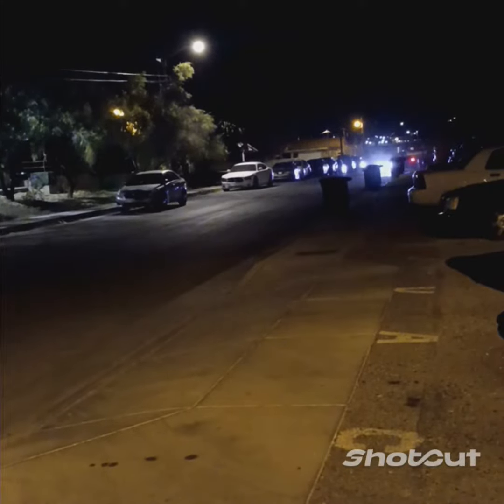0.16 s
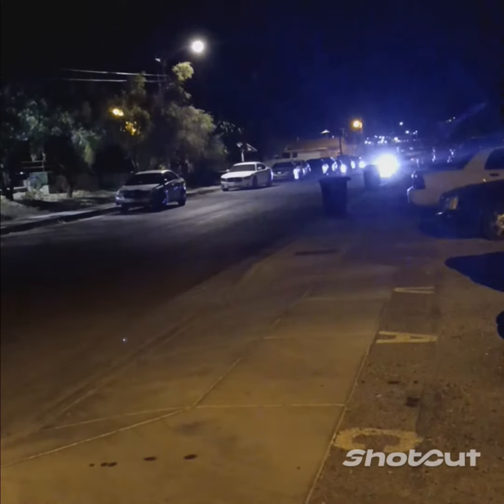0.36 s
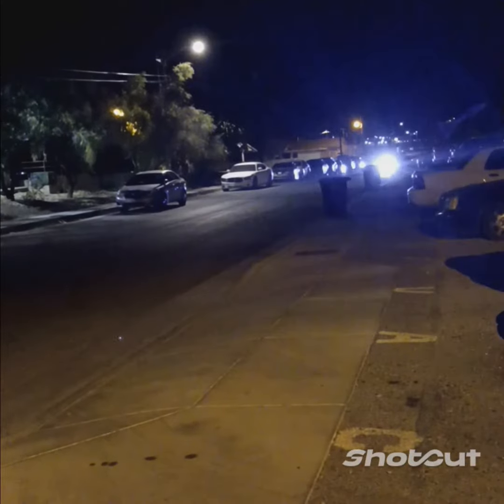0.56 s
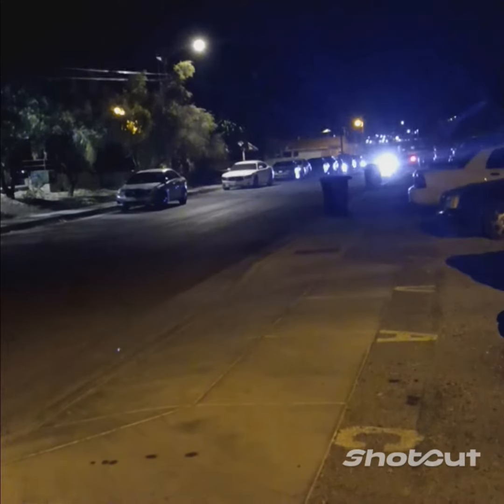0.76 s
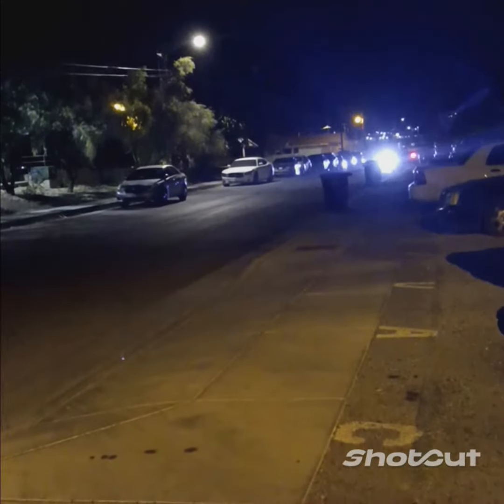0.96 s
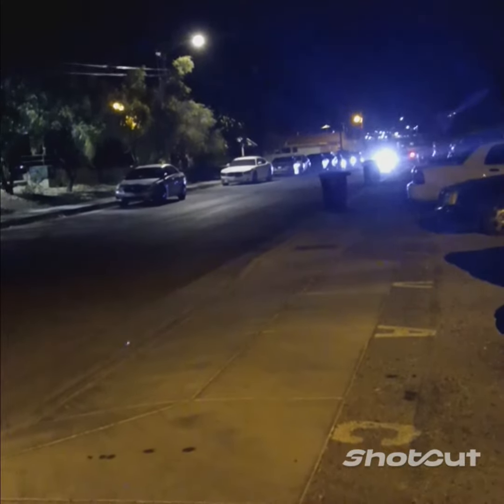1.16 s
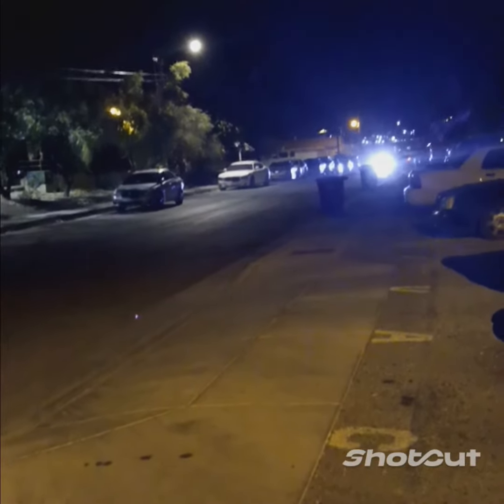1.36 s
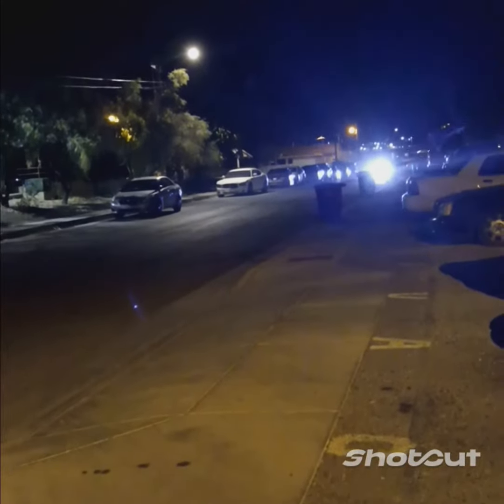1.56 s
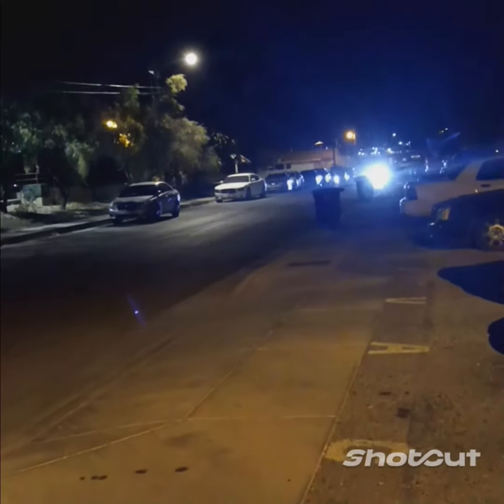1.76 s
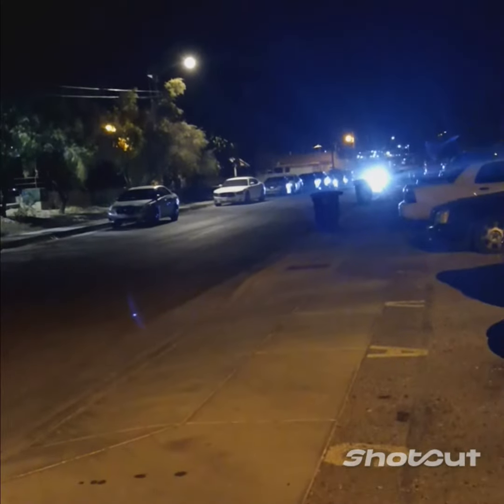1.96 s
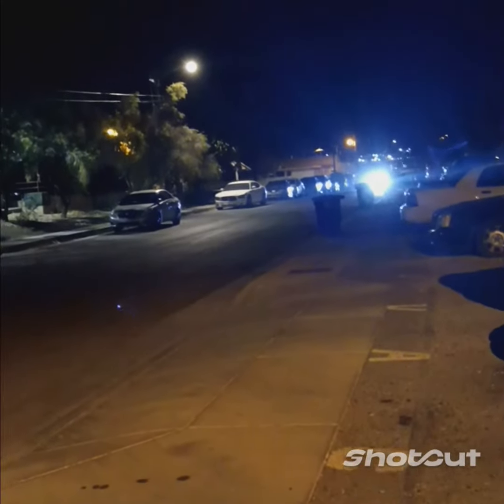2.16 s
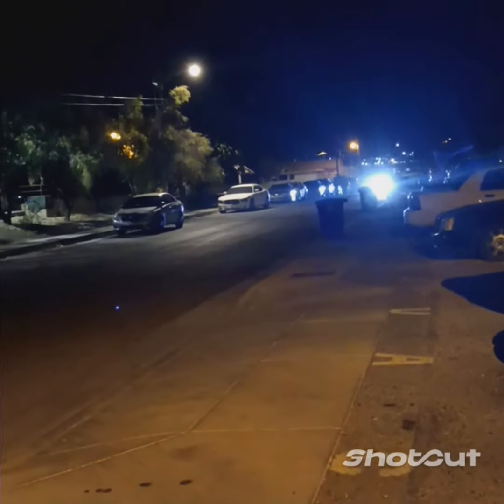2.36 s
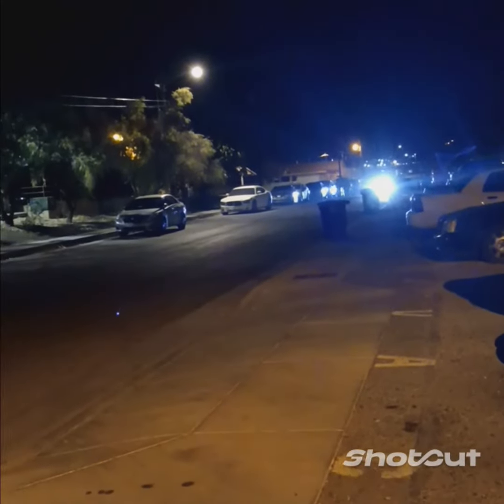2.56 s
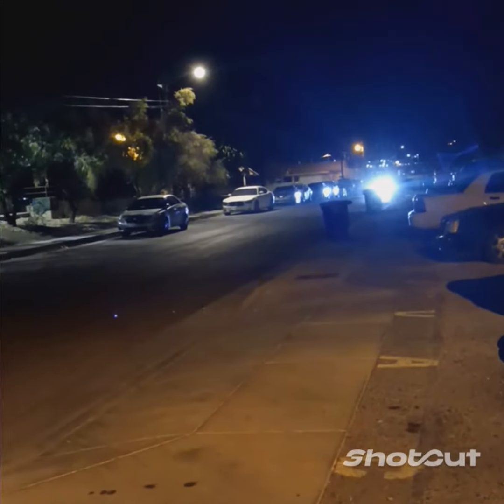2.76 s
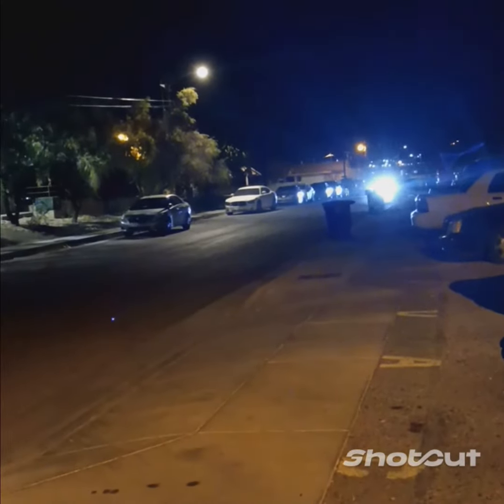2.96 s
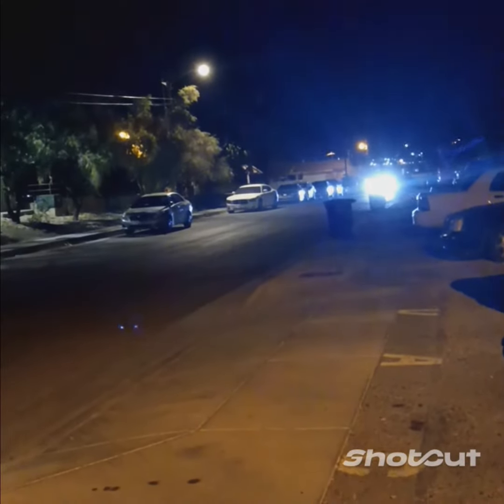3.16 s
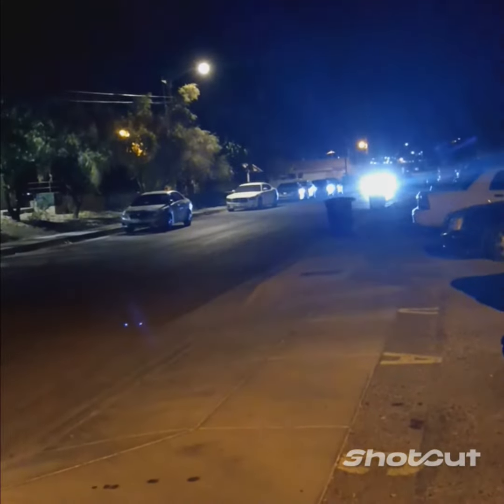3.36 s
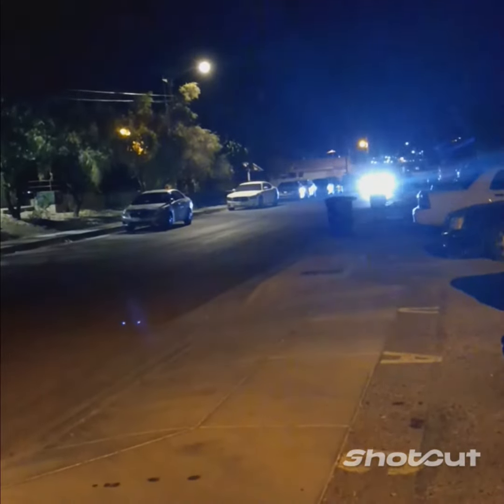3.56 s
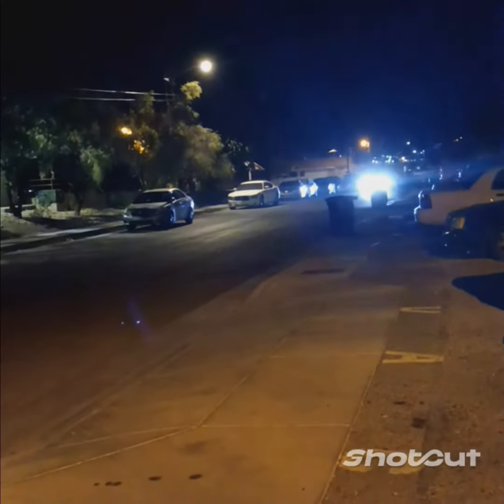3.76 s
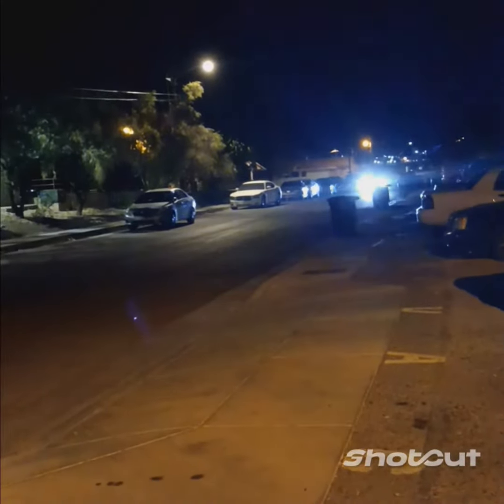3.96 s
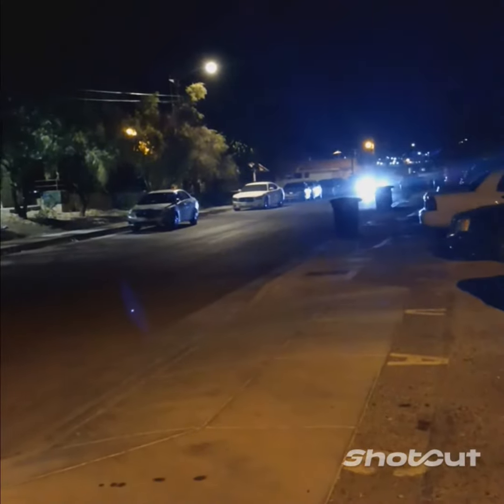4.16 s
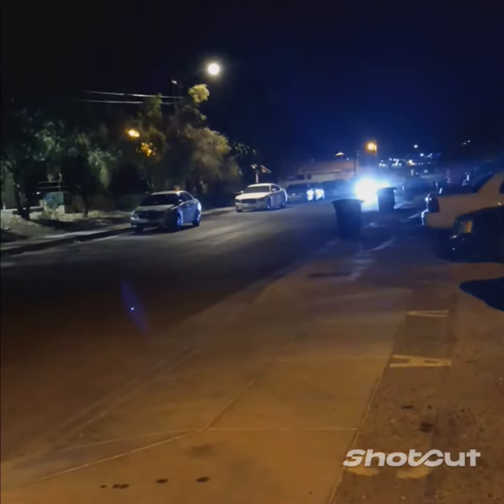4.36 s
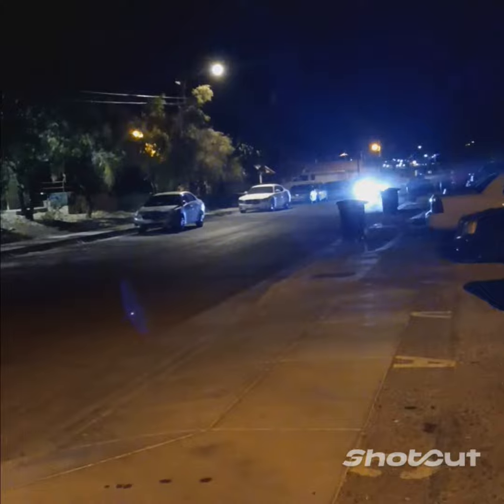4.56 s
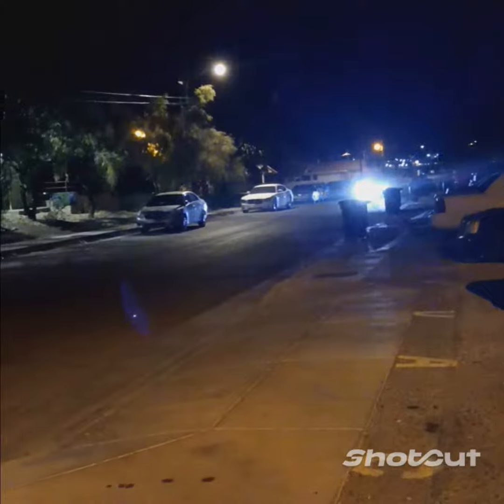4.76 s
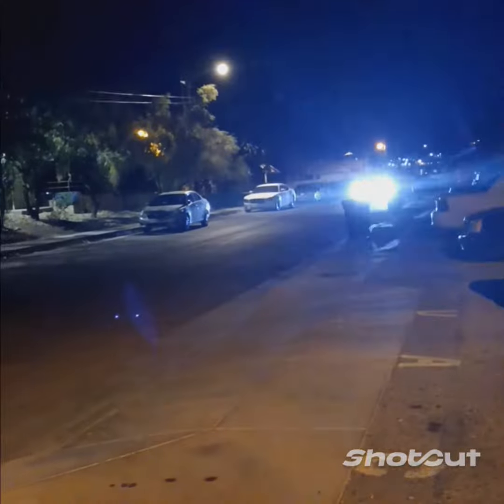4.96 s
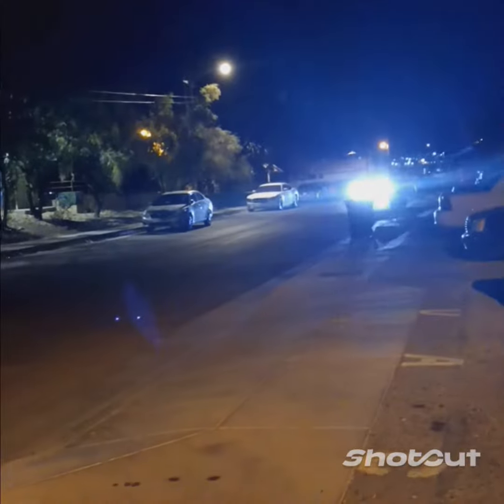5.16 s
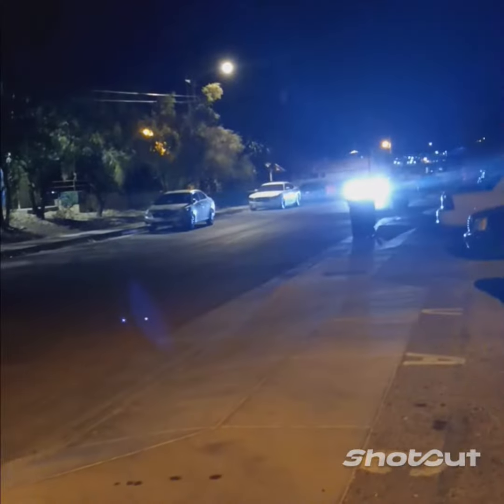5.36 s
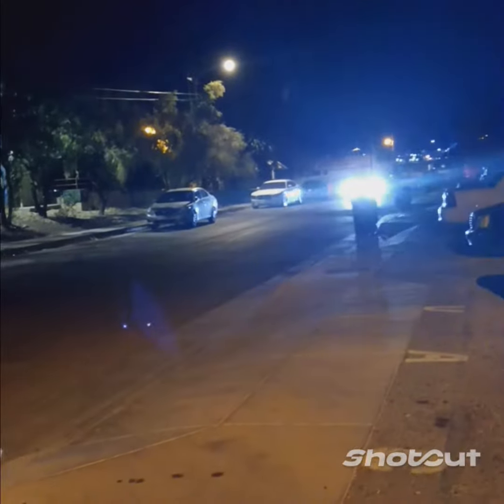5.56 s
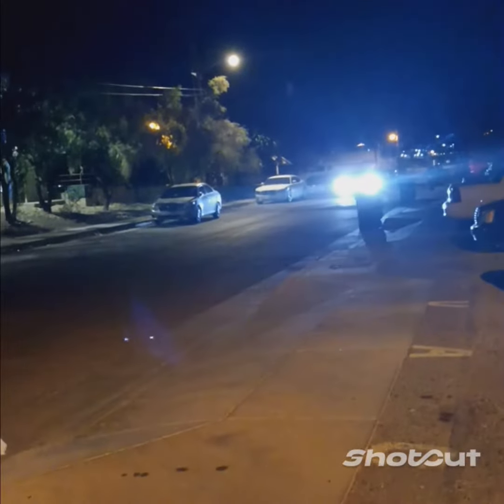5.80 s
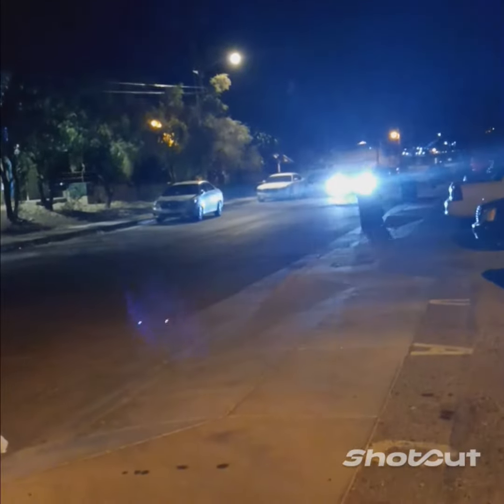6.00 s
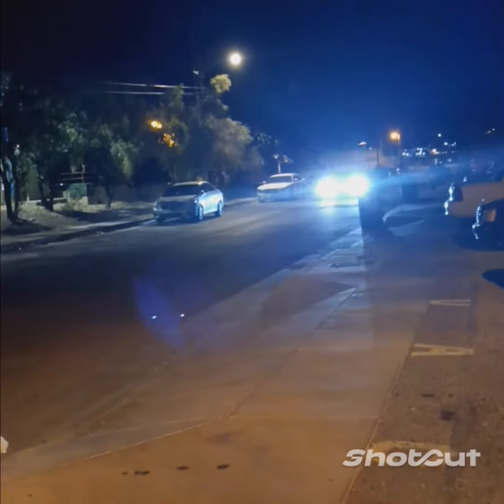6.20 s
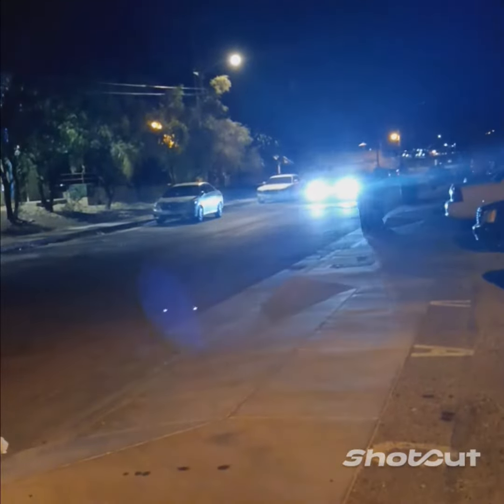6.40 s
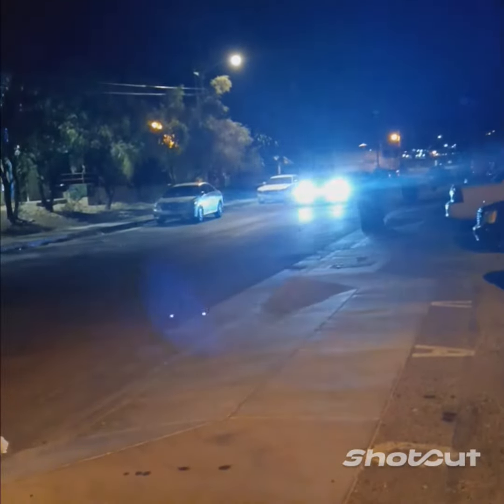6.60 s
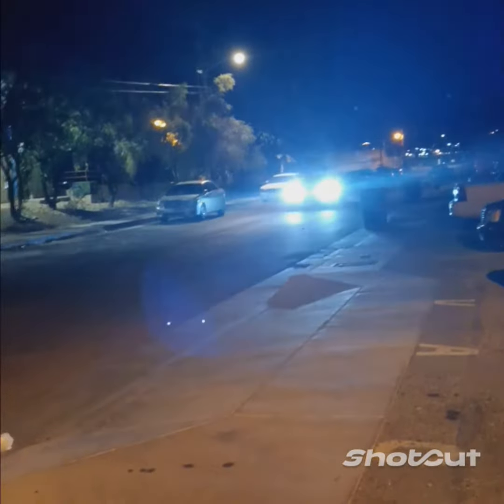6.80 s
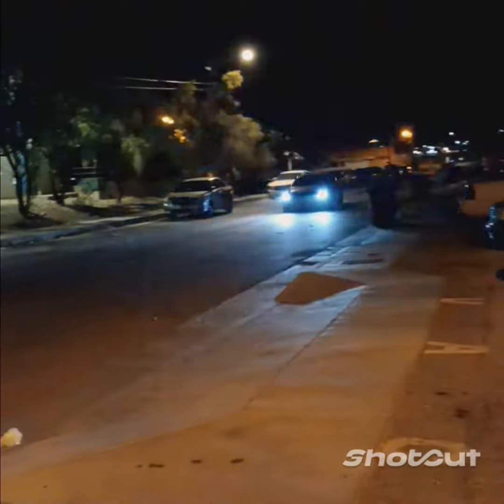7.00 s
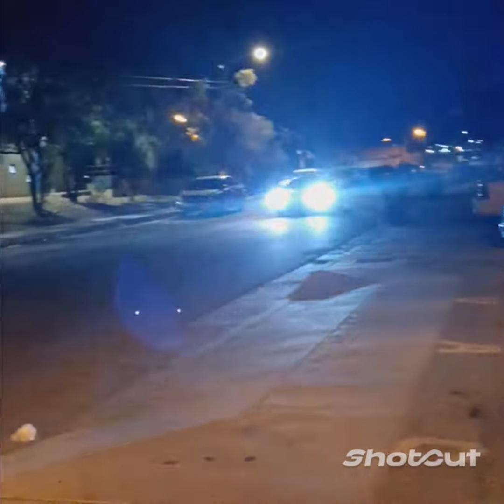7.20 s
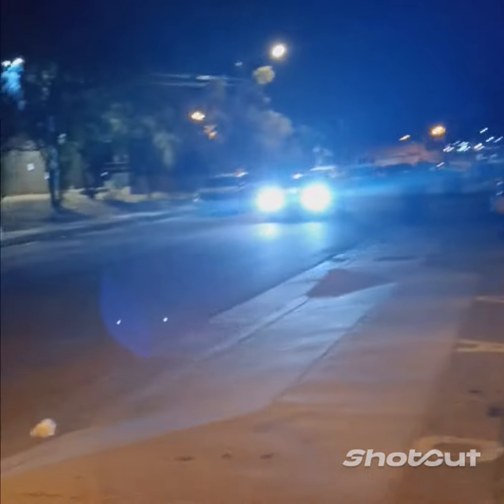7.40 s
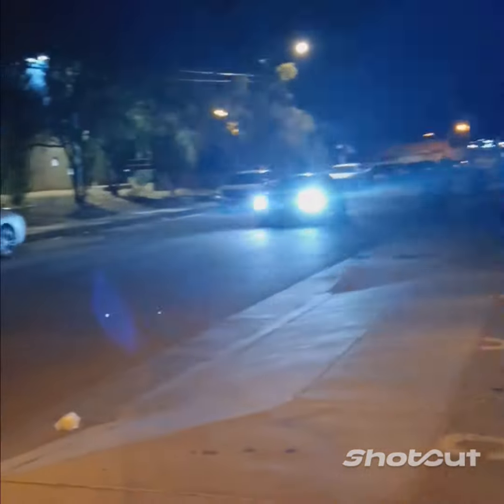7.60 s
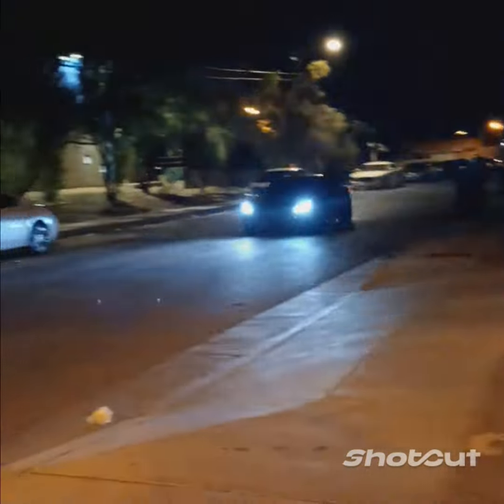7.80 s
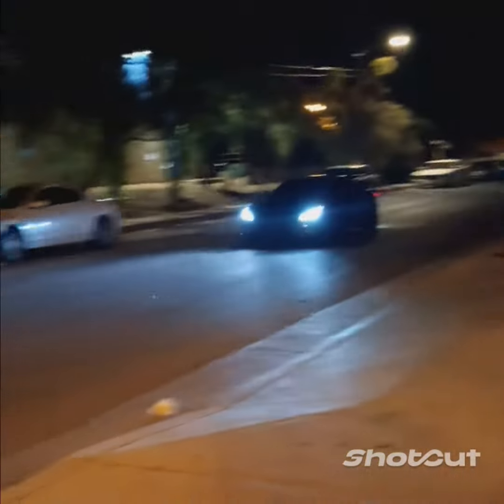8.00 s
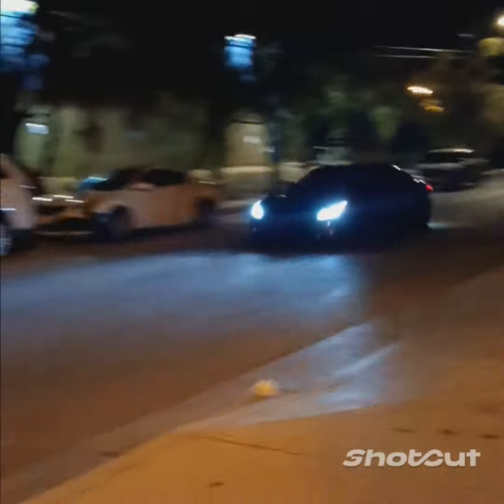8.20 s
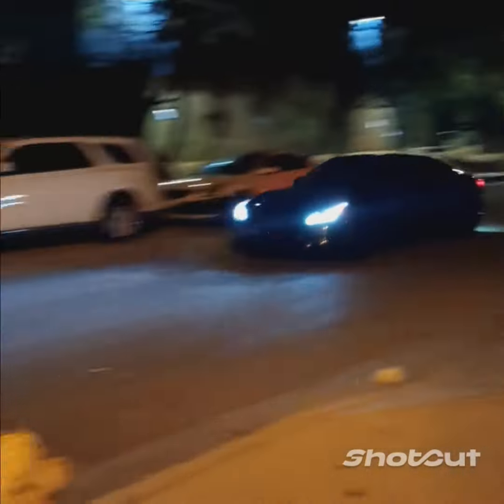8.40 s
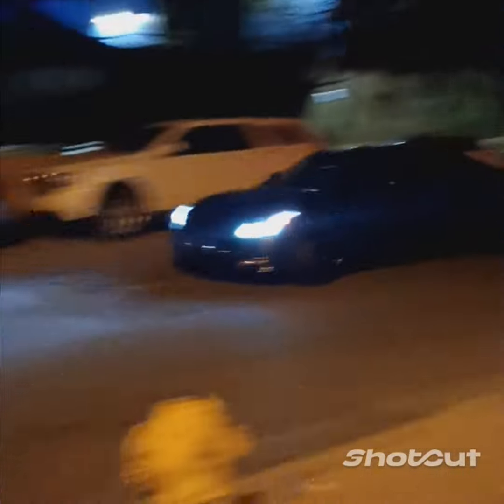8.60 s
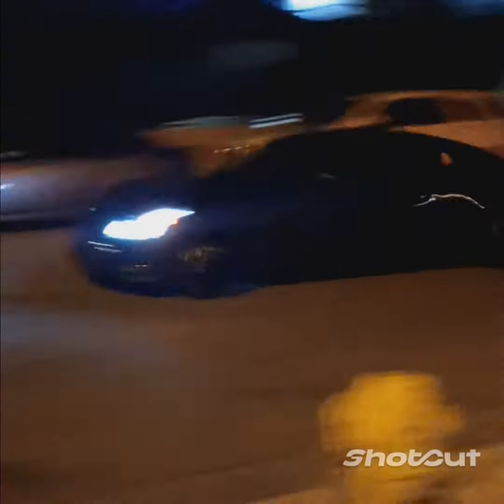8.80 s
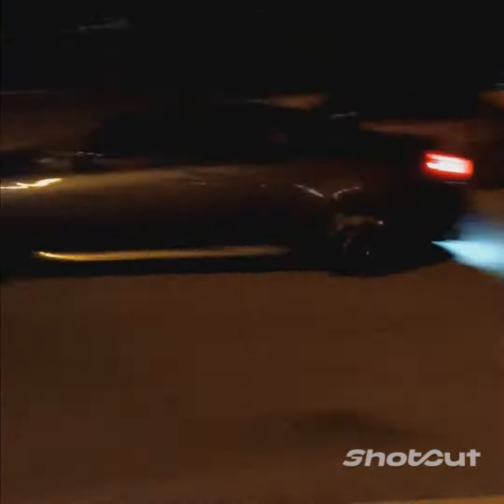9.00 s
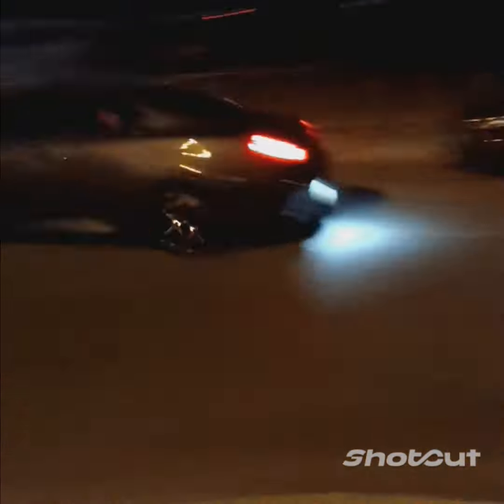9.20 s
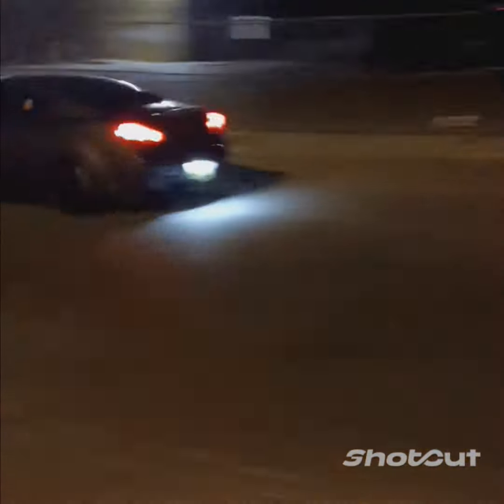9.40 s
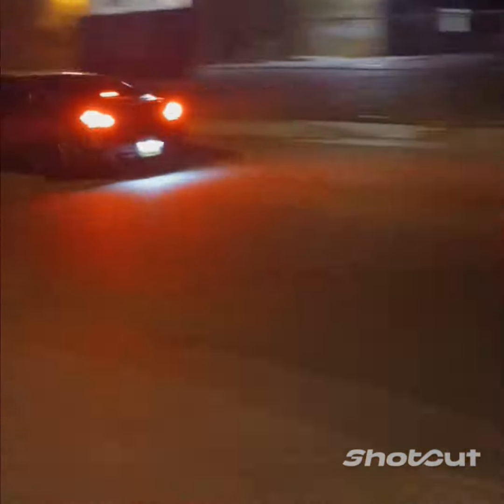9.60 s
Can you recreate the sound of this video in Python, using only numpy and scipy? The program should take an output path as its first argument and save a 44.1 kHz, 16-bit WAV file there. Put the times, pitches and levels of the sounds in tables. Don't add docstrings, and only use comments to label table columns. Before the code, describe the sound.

Handheld phone outdoors at the kerb: a faint low engine note swells into a hollow, wavering exhaust howl, falls back to a low coasting burble over distant traffic drone, then jumps to a hard, raspy bark. The roar grows until it distorts at the closest moment, then the hiss cuts away, leaving a lower droning note and regular stone clicks.

```python
import sys
import numpy as np
from scipy import signal
from scipy.fft import rfft, irfft, next_fast_len
from scipy.io import wavfile
from scipy.ndimage import uniform_filter1d, map_coordinates

SR = 44100
rng = np.random.default_rng(int(sys.argv[2]) if len(sys.argv) > 2 else 0)


def dump_mix(stems):
    frames = np.atleast_2d(stems).T
    limited = np.clip(frames, -1, 1)
    pcm = np.round(limited * 32767).astype(np.int16)
    wavfile.write(sys.argv[1], SR, pcm)


def nominal_scale(level):
    x = np.asarray(level, float) / 20
    return 10 ** x


N = 425565


def unit(x):
    return x / np.sqrt(np.mean(x ** 2) + 1e-20)


def along(points, hz):
    f, v = np.transpose(points)
    return np.interp(np.log(hz + 1), np.log(f + 1), v)


def curves(rows):
    s, *cols = np.transpose(rows)
    return [np.interp(np.arange(N) / SR, s, c) for c in cols]


def bumps(rows):
    t = np.arange(N) / SR
    return sum(db * np.exp(-((t - s) / width) ** 2) for s, db, width in rows)


def wobble(rate):
    coarse = np.arange(0, N + 64, 64)
    knots = rng.standard_normal(1000)
    return np.interp(np.arange(N), coarse, map_coordinates(knots, [coarse * rate / SR]))


def filtered(x, response):
    m = next_fast_len(N + 8192)
    x = np.concatenate([x, x[..., :-4096:-1]], axis=-1)
    return irfft(rfft(x, m) * response(np.fft.rfftfreq(m, 1 / SR)), m)[..., :N]


# f/Hz, coherence [0-1]
COHERENCE = [(100, 0.56), (300, 1), (600, 0.43), (1200, 0.48), (2100, 0.87), (2800, 0.12), (6000, 0.3),
             (11000, .1)]


def rush(spectrum, gate=1):
    turn = lambda hz: np.arccos(np.clip(along(COHERENCE, hz), 0, 1)) / 2
    pair = gate * rng.standard_normal((2, N))
    mid, side = filtered(pair, lambda hz: nominal_scale(along(spectrum, hz)) * [np.cos(turn(hz)), np.sin(turn(hz))])
    return unit(np.array([mid + side, mid - side]))


# t/s, firing rate f/Hz
FIRING_RATE = [(0, 88), (.36, 98), (.9, 151), (1.33, 172), (1.58, 143), (2.3, 175), (3.9, 272), (4.7, 193),
               (4.8, 172), (5.5, 102), (6.04, 82), (6.3, 129), (6.6, 146), (7.62, 160), (7.79, 196),
               (8.7, 209), (9.3, 205), (9.65, 190)]
FLYWHEEL_S = .06
PASS_S, PASS_WIDTH_S, DOPPLER_DROP = 8.79, 0.077, .135


def motion():
    passed = (1 + np.tanh((np.arange(N) / SR - PASS_S) / PASS_WIDTH_S)) / 2
    hz = uniform_filter1d(curves(FIRING_RATE)[0], round(FLYWHEEL_S * SR), mode="nearest")
    return hz * (1 - DOPPLER_DROP * passed), passed


# delay t/s, level/dB
ECHOES = [(.12, -12), (.22, -10), (.34, -8), (.47, -11)]


def order(turns, db, fade, rate, far=0):
    tone = np.exp(2j * np.pi * (turns + rng.random()))
    beat = (1 + fade * (wobble(rate) + 1j * wobble(rate))) * tone
    power = 1 + 2 * fade ** 2
    for s, echo_db in ECHOES if np.any(far) else []:
        late = lambda v: np.pad(v, (round(s * SR), 0), "edge")[:N]
        gain = far * nominal_scale(echo_db + np.minimum(late(db) - db + 3, 0))
        beat += gain * late(tone)
        power = power + gain ** 2
    return np.sqrt(2 / power) * nominal_scale(db) * beat.real


# multiple of the firing rate, level/dB, wander [0-1], wander rate [1/s]
OVERTONES = [(2, -3, 0.48, 22), (3, -7.5, .38, 16), (4, -11, 0, 14), (5, -16, .5, 12)]
OVERRUN_TILT_DB = -4
# multiple, t/s, level/dB, width/s
SWELLS = [(2, 0.63, -8, 0.17), (2, 2.7, 9, 0.22), (2, 3.7, -6.5, 0.33), (2, 5.75, 6, 0.37),
          (2, 6.33, -6, 0.14), (2, 7.9, -7, 0.29), (2, 8.6, 4.5, 0.14), (2, 9.58, -10, 0.092),
          (3, 2.4, 3, 0.27), (3, 6.1, -7.5, 0.18), (4, 2.5, 7.5, 0.38), (3, 9.3, 11, .25),
          (4, 7, -4.5, 0.43), (4, 8.62, -9.5, .1), (4, 8.28, 9.5, 0.13), (5, 3, -6, .5),
          (5, 7.4, 8.5, 0.22), (5, 8.33, 5, .15)]
# f/Hz, level/dB
PIPE = [(85, -3.5), (190, 3), (260, -3.5), (330, -4.5), (410, -12), (475, -4), (545, -23), (790, -9)]


def overtones(turns, hz, loud_db, far, load):
    total = np.zeros(N)
    for k, db, fade, rate in OVERTONES:
        level_db = loud_db + db + along(PIPE, k * hz)
        level_db = level_db + OVERRUN_TILT_DB * k * (1 - load)
        level_db = level_db + bumps([row[1:] for row in SWELLS if row[0] == k])
        total += order(k * turns, level_db, fade, rate, far * (k < 3.5))
    return total


# multiple of the firing rate, level/dB in its family
HALF_ORDERS = [(.5, -0.79), (2 / 3, -2), (1.5, 1.2), (3.4, -7.5)]
# multiple of the firing rate, level/dB in its family
THIRD_ORDERS = [(5 / 6, -10.5), (7 / 6, -11), (4 / 3, 2.6), (5 / 3, -7.5), (10 / 3, -12.5)]
STRAIN_START_HZ, STRAIN_FULL_HZ = 157, 218
HALF_DB, HALF_STRAIN_DB, HALF_OVERRUN_DB = -38, 19.5, 21
THIRD_DB, THIRD_STRAIN_DB, THIRD_OVERRUN_DB = -43.5, 21.5, 20
THIRD_TAIL_DB = 34


def uneven_orders(turns, hz, loud_db, load, passed):
    strain = np.clip((hz - STRAIN_START_HZ) / (STRAIN_FULL_HZ - STRAIN_START_HZ), 0, 1)
    overrun = 1 - load
    half_db = loud_db + HALF_DB + np.maximum(HALF_STRAIN_DB * strain, HALF_OVERRUN_DB * overrun)
    third_db = loud_db + THIRD_DB + np.maximum(THIRD_STRAIN_DB * strain, THIRD_OVERRUN_DB * overrun)
    third_db = third_db + THIRD_TAIL_DB * passed * overrun
    halves = sum(order(k * turns, half_db + db, .45, 9) for k, db in HALF_ORDERS)
    thirds = sum(order(k * turns, third_db + db, .28, 8) for k, db in THIRD_ORDERS)
    return halves + thirds


BODY_HZ, DOWNSHIFT_S, BODY_DB, BODY_WIDTH_S = 149, 4.7, -28, .13


def body_boom():
    swell = bumps([(DOWNSHIFT_S, 1, BODY_WIDTH_S)])
    return swell * order(BODY_HZ * np.arange(N) / SR, BODY_DB, .25, 12)


# t/s, level/dB
LOUDNESS = [(0, -28.5), (.4, -36.5), (.55, -25.5), (1, -22), (1.5, -18), (2.7, -17.5), (4.1, -18.5),
            (4.3, -27), (4.7, -31.5), (5.15, -16), (5.6, -21.5), (6, -20), (6.3, -7.5), (7.6, -11),
            (8.3, -6), (8.86, -1.5), (9.03, -9), (9.65, -10.5)]
# t/s, strength of the echoes, throttle [0-1]
ECHO_AND_THROTTLE = [(0, .8, .3), (.76, .75, 1), (2, .75, 1), (3.2, 1.2, 1), (4.11, 1.2, 1), (4.22, 1.1, 0),
                     (6.08, .7, 0), (6.36, .4, 1), (7, .7, 1), (7.6, .35, 1), (8.85, .3, 1),
                     (9.03, .5, .35), (9.65, .6, .35)]
# t/s, depth level/dB, width/s
NULLS = [(1.36, 7.5, 0.064), (2.17, 11.5, .02), (4.14, -9, .04), (4.21, 11, 0.022), (5.04, 19.5, 0.016),
         (5.3, 23.5, 0.041), (5.68, 10, 0.065), (5.98, 9, 0.07), (6.19, 7.5, .015), (6.25, 10, 0.018),
         (6.36, -0.5, .05), (6.47, 10, .03), (6.61, 7, 0.046), (6.87, 5, 0.069), (7.06, 7, 0.046),
         (7.17, 10.5, 0.059), (7.4, -2, 0.074), (7.52, 17.5, 0.03), (7.72, 3.5, .03), (7.88, -4.5, 0.042),
         (8.02, 11.5, 0.033), (8.28, 7.5, 0.037), (8.45, -1, 0.064), (9.02, 7.5, 0.06), (9.13, -3, 0.045),
         (9.4, 6, 0.098)]
# f/Hz, level/dB
BOOM = [(35, -87.5), (90, -42.5), (130, 0), (250, -2), (400, -4.5), (1500, -120)]


def pipe_tones():
    hz, passed = motion()
    loud_db = curves(LOUDNESS)[0]
    far, load = curves(ECHO_AND_THROTTLE)
    turns = np.cumsum(hz) / SR
    first_db = loud_db + along(PIPE, hz)
    low = order(turns, first_db - bumps(NULLS), .21, 28, far)
    low += overtones(turns, hz, loud_db, far, load)
    low += uneven_orders(turns, hz, loud_db, load, passed)
    low += body_boom()
    low = filtered(low, lambda f: f ** 6 / (f ** 6 + 58. ** 6))
    return low + nominal_scale(uniform_filter1d(first_db, SR // 4) - 20.5) * rush(BOOM)


# f/Hz, T60 t/s
STREET = [(100, 0.17), (600, 0.76), (3000, 0.049)]


def street(x):
    hz, t, z = signal.stft(rng.standard_normal((2, SR // 2)), SR, nperseg=256)
    decay = nominal_scale(-60 * t / along(STREET, hz)[:, None])
    a, b = signal.istft(z * decay, SR, nperseg=256)[1]
    tail = np.array([a + 1.22 * b, a - 0.6 * b])
    return signal.fftconvolve(x[None], tail / np.linalg.norm(tail[0]), axes=1)[:, :N]


# level/dB, delay t/ms (one bank has the longer pipe)
CYLINDERS = [(0, 0), (-3, .2), (1, -.05), (-4, .16), (-1, .05), (-2.5, .25)]
# f/Hz, level/dB
BARK = [(460, -6.5), (550, -12), (680, 1), (820, -3), (1150, -5), (2100, -12), (2650, -20.5), (6000, -120)]
BARK_LOW_HZ = 131


def bark(turns, hz):
    at = np.flatnonzero(np.diff(np.floor(turns)))
    chance = rng.standard_normal((len(at), 2))
    size_db, late_ms = np.resize(CYLINDERS, (len(at), 2)).T
    late = np.round(late_ms * SR / 1000 + 2.5 * chance[:, 0]).astype(int)
    pulses = np.zeros(N)
    pulses[np.clip(at + late, 0, N - 1)] = nominal_scale(size_db + 1.7 * chance[:, 1])
    pipe = lambda f: nominal_scale(along(BARK, f)) * np.exp(-1j * 2.5 * np.log(f + 1))
    pulses = filtered(-pulses / np.sqrt(hz), pipe)
    knocks = unit(unit(pulses) + 1.1 * unit(street(pulses)))
    gas = rush(BARK, 0.24 + np.exp(-(turns % 1) / 2.2))
    return filtered(.83 * knocks + .56 * gas, lambda f: f ** 4 / (f ** 4 + BARK_LOW_HZ ** 4))


# f/Hz, level/dB
TYRES = [(250, -26), (400, -6.5), (530, -6), (720, 2.5), (1150, -2.5), (2100, -8), (2450, -25), (6000, -90)]


def tyre_roar():
    return nominal_scale(0.37 * wobble(7.6)) * rush(TYRES)


# f/Hz, level/dB
RASP = [(900, -120), (2600, 6), (3900, 1), (6000, -1), (8500, -2), (10000, -7), (11500, -16), (14500, -120)]
# f/Hz, level/dB
SIZZLE = [(5000, -120), (9500, -1), (11500, -8), (13500, -9), (15500, -11), (16000, -54.5)]
# t/s, level/dB, width/s
FLARES = [(.8, 2.5, 0.1), (1.35, -5, 0.081), (1.92, 3, .06), (2.36, 2.5, 0.11), (3, 0, 0.035),
          (6.3, 1.5, 0.028), (6.66, 5, 0.15), (6.96, 9, 0.11), (7.22, 5, 0.071), (7.36, 3.5, 0.093),
          (7.58, 4.5, 0.16), (8.64, 3.5, 0.13), (9.1, 5, 0.065)]
RASP_DB, RASP_GROWS, RASP_KNEE_DB, RASP_TAIL_DB = -39, 1.39, -21.5, 5.5
RASP_OVERRUN_DB, WIDE_OPEN, COAST_HISS_DB = -11, .45, -32
TIP_SPACING_HZ, TIP_PEAK_HZ, TIP_RIPPLE_DB, TIP_FADES_HZ = 1000, 4200, 3, 7000


def tip_response(f):
    ripple = np.cos(2 * np.pi * (f - TIP_PEAK_HZ) / TIP_SPACING_HZ)
    return nominal_scale(TIP_RIPPLE_DB * ripple / (1 + (f / TIP_FADES_HZ) ** 4))


def rasp(turns, passed, load, gas_db):
    shut = np.clip((1 - load) / WIDE_OPEN, 0, 1) * (1 - passed)
    rasp_db = RASP_DB + RASP_GROWS * (gas_db - RASP_KNEE_DB)
    rasp_db = rasp_db + RASP_TAIL_DB * passed + RASP_OVERRUN_DB * shut + bumps(FLARES)
    rasp_db = np.maximum(rasp_db, gas_db + COAST_HISS_DB)
    puff = 0.94 + np.exp(-(turns % 1) / 0.31)
    sizzle = nominal_scale(np.clip(0.4 * (rasp_db + 28.0), -14, 0) - 8) * rush(SIZZLE, puff)
    flutter = nominal_scale(.5 * wobble(12) + .8 * wobble(30))
    return nominal_scale(rasp_db) * flutter * filtered(rush(RASP, puff) + sizzle, tip_response)


# t/s, level/dB
GAS = [(0, -52), (.4, -80), (.54, -46.5), (.96, -29.5), (1.68, -27.5), (1.95, -21.5), (2.5, -25),
       (3.12, -21.5), (4.02, -22.5), (4.22, -36), (4.7, -40.5), (6.12, -39.5), (6.42, -21.5), (7.8, -17),
       (8.3, -12), (8.77, -10.5), (8.95, -28.5), (9.65, -33.5)]


def blasts():
    hz, passed = motion()
    load, gas_db = curves(ECHO_AND_THROTTLE)[1], curves(GAS)[0]
    turns = np.cumsum(hz) / SR
    mid = load * bark(turns, hz) + np.sqrt(1 - load ** 2) * tyre_roar()
    return nominal_scale(gas_db + 0.49 * wobble(13)) * mid + rasp(turns, passed, load, gas_db)


# f/Hz, level/dB
NIGHT = [(40, -16), (80, -3), (150, -3), (400, -15.5), (1200, -36.5), (4000, -120)]
# t/s, level/dB
RUMBLE = [(0, -51.5), (3.2, -49), (3.5, -30), (5, -30), (6.3, -43.5), (6.9, -58.5), (8.2, -43), (8.65, -38),
          (9, -48), (9.65, -41)]
# f/Hz, level/dB
DRONE = [(18, -37.5), (33, -7.5), (50, 4), (90, 1), (160, -13), (500, -120)]


def night():
    return nominal_scale(-37.0) * rush(NIGHT) + nominal_scale(curves(RUMBLE)[0] - 9.5) * rush(DRONE)


# t/s, peak level/dB
TICKS = [(2.36, -45), (2.41, -42), (6.2, -48), (5.4824, -59), (5.599, -61), (8.984, -28.5), (9.0924, -27),
         (9.208, -29), (9.3248, -28.5), (9.441, -25), (9.5616, -25.5)]
# f/Hz, level/dB
STONE = [(2000, -30.5), (3500, -4.5), (10000, -5), (14000, -19.5), (16000, -29)]


def pad_clicks_and_stone():
    burst, t = np.zeros(N + SR), np.arange(SR // 10) / SR
    for s, db in TICKS:
        decay_s = .08 * min(1, nominal_scale(db + 45)) + .012
        burst[round(s * SR):][:len(t)] += nominal_scale(db - 8 - 60 * t / decay_s)
    return burst[:N] * rush(STONE)


# f/Hz, level/dB
HUM = [(43, -46.5), (65, -41.5)]
HUM_START_S = 2.7


def cooling_unit():
    t = np.arange(N) / SR
    hum = sum(nominal_scale(db + 0.5 + wobble(1.9)) * np.sin(2 * np.pi * hz * t) for hz, db in HUM)
    return np.clip((t - HUM_START_S) * 10, 0, 1) * hum


# start t/s, length/s, f/Hz, width/Hz, level/dB
SQUEAKS = [
    (4.45, .08, 4830, 200, -50),
    (4.51, .12, 4770, 130, -54),
    (4.45, .09, 9620, 300, -54),
    (4.5, .13, 9550, 350, -63),
    (4.22, .33, 3120, 350, -70),
    (5.2, .41, 7350, 700, -69),
    (5.38, .22, 7950, 600, -72),
]


def brake_squeaks():
    out = np.zeros(N)
    for s, length, hz, width, db in SQUEAKS:
        span = np.arange(round(length * SR)) / SR
        drift = unit(uniform_filter1d(rng.standard_normal(SR), 60))
        flutter = np.cumsum(drift)[:len(span)] * np.pi * width / SR
        swell = np.sqrt(2 * np.sin(np.pi * span / length))
        out[round(s * SR):][:len(span)] += nominal_scale(db) * swell * np.sin(2 * np.pi * hz * span + flutter)
    return out


def scene():
    return pipe_tones() + blasts() + night() + pad_clicks_and_stone() + cooling_unit() + brake_squeaks()


def thinned(x, keep, faint_db):
    hz, _, z = signal.stft(np.pad(x, ((0, 0), (0, 2048)), "reflect"), SR, nperseg=1024)
    power, hz = np.abs(z) ** 2, hz[:, None]
    local = uniform_filter1d(uniform_filter1d(power, 12, 1), 3, 2)
    treble = np.mean(power[:, 130:230], axis=(0, 1))
    strong = power > keep * local
    present = (hz < 10800) | (local > nominal_scale(2 * faint_db) * treble)
    kept = (strong & present) | (hz < 1200)
    return signal.istft(z * kept, SR, nperseg=1024)[1][:, :N]


def roll_off(x):
    return signal.sosfilt(signal.butter(12, 15820, fs=SR, output="sos"), x)


# f/Hz, left-right level/dB
PORTS = [(300, 0.5), (430, -2), (600, 0.5), (820, -2), (1300, -1.5), (2100, 3.5), (3000, -4.5), (6400, 3),
         (8600, 0), (10300, -8), (12500, -7.5), (15000, -1)]
# f/Hz, phase [rad]
TWIST = [(150, -.1), (300, 0.26), (430, 0.0036), (600, -1.12), (820, 0.57), (1030, 0.99), (1400, -0.49),
         (2100, 0.35)]
LAG_S = 43 / SR
FADE_OUT_S = .004


def record(dry):
    late = lambda hz: np.exp(-2j * np.pi * hz * LAG_S - 1j * along(TWIST, hz))
    left = lambda hz: nominal_scale(along(PORTS, hz) / 2) * late(hz)
    right = lambda hz: nominal_scale(-along(PORTS, hz) / 2)
    x = filtered(dry, lambda hz: [left(hz), right(hz)] * (hz > 15))
    x = x / (1 + np.abs(x / 1.02) ** 8) ** (1 / 8)
    x = thinned(x, keep=.65, faint_db=-10.5)
    x = filtered(x, lambda hz: hz ** 2 / (hz ** 2 + 15 ** 2))
    x += nominal_scale(-84) * rng.standard_normal(x.shape)
    x *= np.clip((N - np.arange(N)) / SR / FADE_OUT_S, .1, 1)
    return roll_off(np.clip(x, -1, 1))


dry = scene()
out = record(dry)
dump_mix(out)
```